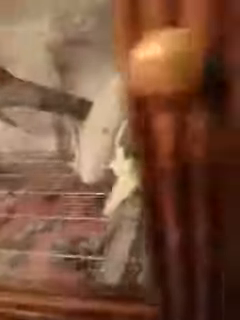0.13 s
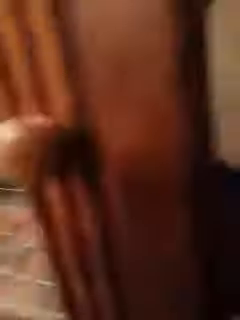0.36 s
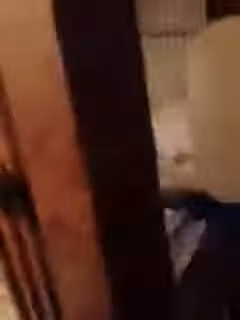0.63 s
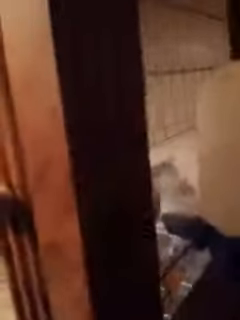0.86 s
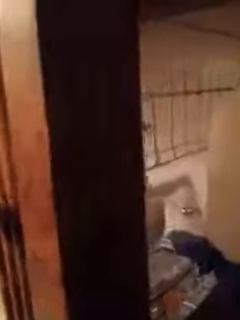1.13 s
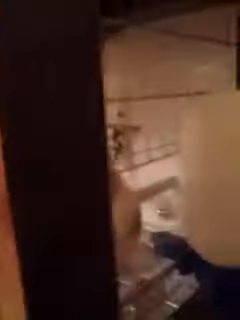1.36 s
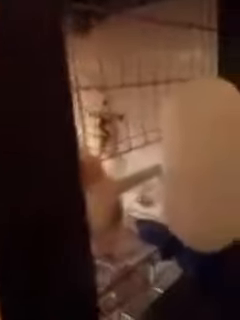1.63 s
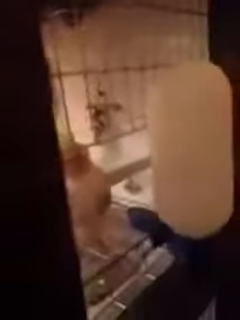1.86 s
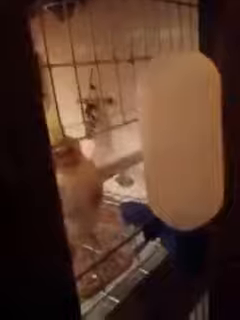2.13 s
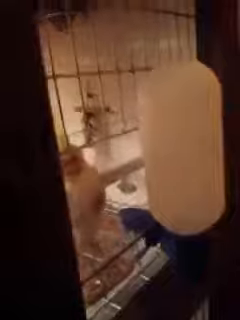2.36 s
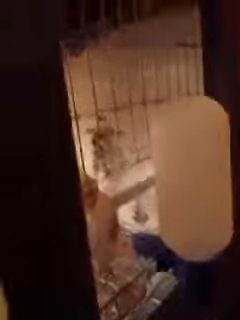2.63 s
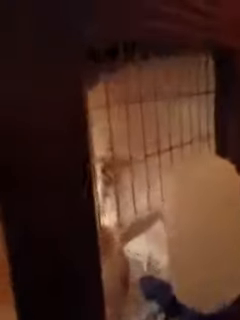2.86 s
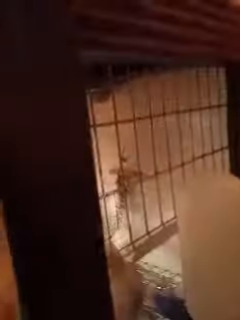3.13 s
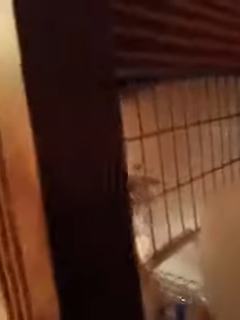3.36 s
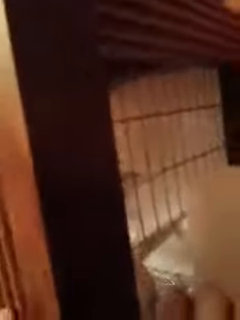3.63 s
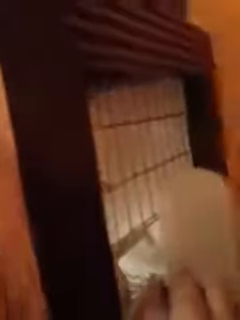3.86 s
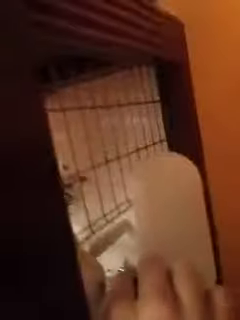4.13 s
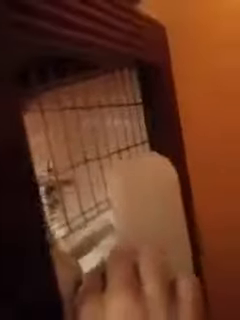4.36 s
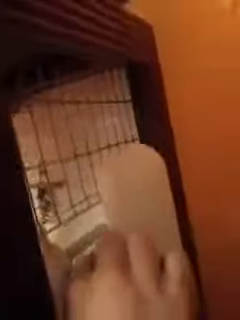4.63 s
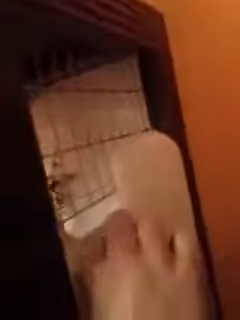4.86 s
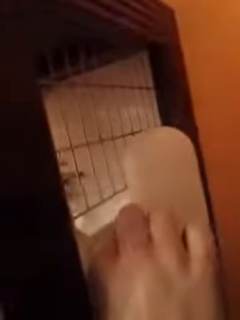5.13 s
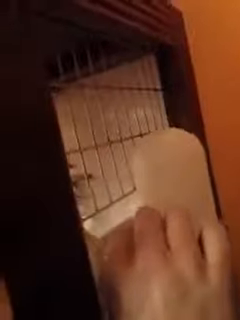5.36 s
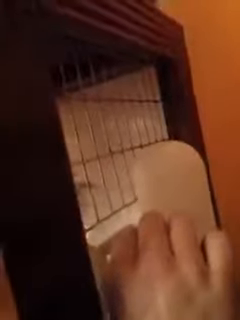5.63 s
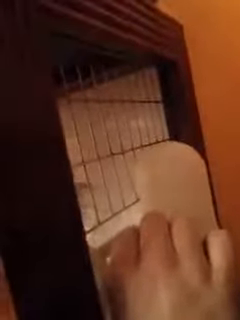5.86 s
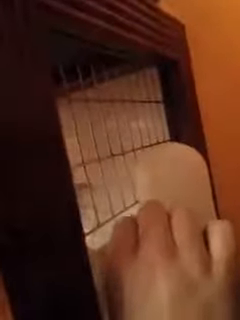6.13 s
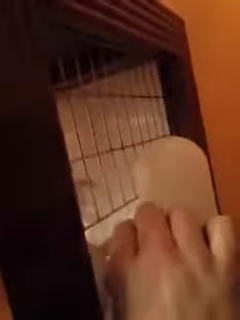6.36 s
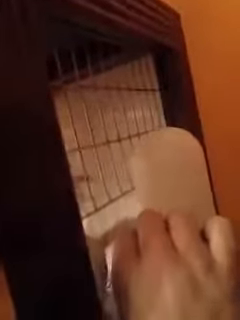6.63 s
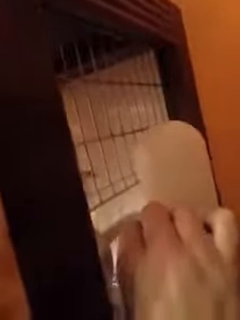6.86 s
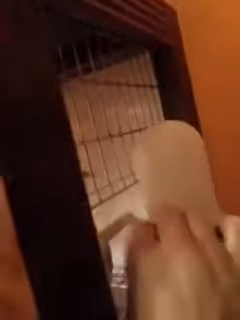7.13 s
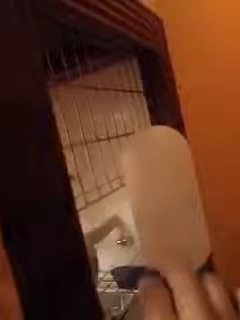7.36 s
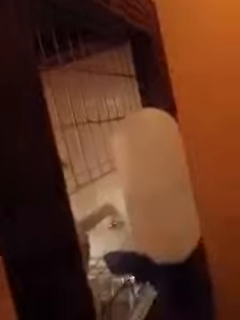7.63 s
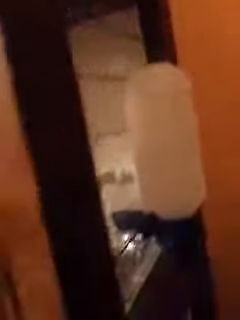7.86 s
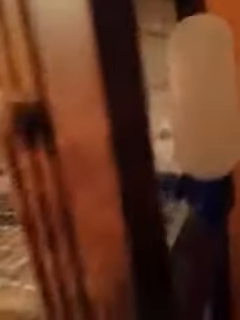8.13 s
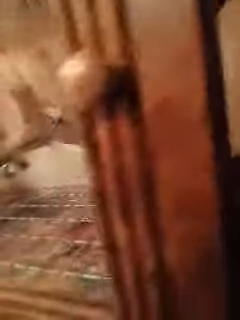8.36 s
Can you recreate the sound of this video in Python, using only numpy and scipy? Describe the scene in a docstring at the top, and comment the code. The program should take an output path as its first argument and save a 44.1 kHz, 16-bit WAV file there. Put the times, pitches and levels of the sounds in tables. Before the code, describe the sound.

A small quiet room, heard close by a phone in stereo, with faint hiss, a weak low hum and a short dull room tail. At 0 s a soft bump and rub are already fading; a light tick follows at 0.5. Gentle scuffs and muffled bumps continue, with a clearer knock at 2.2. From 2.7 to 3.0 a bright rustle of skin on wire swells, with a sharp click at 2.87 and a tiny wire ring at 3.0, then a dull knock at 3.14. Rubbing swells around 3.4 and 3.9, then calms. At 5.14 a hollow wooden thump sounds with a brief panel hum. Soft low bumps come near 5.9, and a dish scrapes finely from 6.0 to 6.6. At 6.66 one hard, bright, woody knock is the loudest event, with a rough short tail. Faint scuffs, ticks and small bumps last until 8.5, over a barely audible distant engine.

```python
"""Hands at a wooden birdcage

Close by in a small quiet room, hands work at a cage and its feeding dish. Tiny random slips, filtered,
make skin rub on wire and wood and the dish slide. Fading sines ring for bumps, one hard knock and a
flicked wire; a wavering sine hums for a shaken thin panel; short noise bursts make ticks and scratches.
A phone hears it all through two ports, with a brief room tail over faint hiss, a low hum and a far engine."""
import sys
import numpy as np
from scipy import signal
from scipy.fft import rfft, irfft
from scipy.io import wavfile
from scipy.ndimage import uniform_filter1d, map_coordinates

SR = 44100
rng = np.random.default_rng(int(sys.argv[2]) if len(sys.argv) > 2 else 0)


def invert_db(x):
    """Field ratio 10**(x/20) for x, a level in decibels (scalar or array-like)."""
    u = np.asarray(x, float) / 20
    return 10 ** u


def generate_wav(signal):
    """Clip the signal to [-1, 1] and save it as 16-bit WAV at the path in sys.argv[1]."""
    frames = np.transpose(np.atleast_2d(signal))
    scaled = np.clip(frames, -1, 1) * 32767
    pcm = np.round(scaled).astype(np.int16)
    wavfile.write(sys.argv[1], SR, pcm)


N = 374850
TIME = np.arange(N) / SR  # s
HZ = np.maximum(np.fft.rfftfreq(N, 1 / SR), 1)
SWELL_DB = 20  # rise and fade times of gestures are times to change by this much


def unit(x):
    """Scale a sound to rms 1."""
    return x / np.sqrt(np.mean(x ** 2))


def curves(table):
    """Join a timed table's points by straight lines: one value per sample for each column after the time."""
    s, *columns = np.transpose(table)
    return [np.interp(TIME, s, column) for column in columns]


def gains(points):
    """Gain at every frequency from (Hz, dB) points."""
    hz, db = np.transpose(points)
    return invert_db(np.interp(np.log(HZ), np.log(hz), db))


def colour(x, gain):
    """Filter by a gain per frequency."""
    return irfft(rfft(x) * gain, N)


def walk(rate):
    """Wander at random: levels held 1 / rate s, smoothed twice, scaled to rms 1."""
    hold = int(SR / rate)
    steps = np.repeat(rng.standard_normal(N // hold + 1), hold)
    smooth = uniform_filter1d(uniform_filter1d(steps, hold), hold)
    return unit(smooth[:N])


def tone(hz):
    """A sine of rms 1 on a moving pitch."""
    return np.sqrt(2) * np.sin(2 * np.pi * np.cumsum(hz) / SR)


def grit(per_s, scatter_db):
    """Tiny slips at random moments, many small and a few large."""
    slips = rng.random(N) < per_s / SR
    return slips * rng.standard_normal(N) * invert_db(scatter_db * rng.exponential(size=N))


def swells(s, db, rise_s, fade_s, held_s=0, share=1, rounded=1):
    """Gain of overlapping gestures: each swells to its peak, is held and fades; powers add."""
    t = TIME[::64, None]  # a coarse clock is enough for slow gains
    before = np.maximum(s - t, 0) / np.maximum(rise_s, .003)
    after = np.maximum(t - s - held_s, 0) / np.maximum(fade_s, .003)
    # rounded: 1 = pointed peak, 2 = bell
    each = invert_db(db - share * SWELL_DB * (before + after) ** rounded)
    return np.interp(TIME, t[:, 0], np.sqrt(np.sum(each ** 2, axis=1)) + 1e-9)


def add(track, s, sound):
    """Mix a sound in at s seconds."""
    i = max(int(s * SR), 0)
    track[i:i + len(sound)] += sound[:N - i]


# tone colour of the room's hiss: f/Hz, level/dB (per Hz)
HISS_COLOUR = [(16, -31), (28, -7.5), (95, -3), (153, -1.5), (211, -9), (421, -9.5), (697, -20),
               (1070, -19.5), (1280, -21), (2560, -26), (5380, -24), (8460, -27.5), (14800, -27),
               (16000, -42.5)]
# overall hiss, before the left/right balance: level/dB
HISS_DB = -67
# a low hum swells and sinks around these levels: t/s, level/dB
HUM = [(0.0, -65), (0.25, -85), (0.77, -79), (1.21, -97), (1.25, -92), (2.88, -65.5), (3.07, -76.5),
       (5.1, -82)]
# a far engine through the walls, its level wandering around these: t/s, f/Hz, level/dB
ENGINE = [(5.15, 38.3, -77), (5.26, 38.2, -62), (5.85, 37, -66), (6.45, 37.2, -66), (6.8, 39, -57.5),
          (7.15, 43.8, -68.5), (7.73, 43.4, -62), (8.07, 39.6, -65), (8.5, 39.4, -61.5)]


def floor():
    """Room tone and microphone hiss, alike left and right only in the bass, a low hum and a far engine."""
    mid, side = rng.standard_normal((2, N))
    apart = np.array([[1], [-1]]) / (1 + (350 / HZ) ** 0.68)
    hiss = unit(colour(mid, gains(HISS_COLOUR)) + colour(side, gains(HISS_COLOUR) * apart))
    engine_hz, engine_db = curves(ENGINE)
    comes_in = np.clip(3 * (TIME - 4.85), 0, 1)
    engine = invert_db(engine_db + 1.5 * walk(9.7)) * tone(engine_hz) * comes_in
    hum_hz = 47.2 * (1 + .03 * walk(5.5))
    hum = invert_db(curves(HUM)[0] + 2.6 * walk(8.)) * tone(hum_hz)
    balance = invert_db(np.array([[-.7], [.7]]))  # dB: left a little softer than right
    return balance * (invert_db(HISS_DB) * hiss + engine + hum)


def patchy(x, low_hz, count, patchy_db):
    """Half-octave bands that flicker apart, as the rubbed spot keeps changing."""
    out = 0
    for hz in low_hz * 2 ** (np.arange(count) / 2):
        band = np.clip(1 - 2 * np.abs(np.log2(HZ / hz)), 0, 1)
        out = out + invert_db(patchy_db * walk(35.)) * colour(x, band)
    return out


# notes of the wires: f/Hz, t60/s (time to fade 60 dB when rubbed; a flick rings 2.1 times as long)
WIRES = [(2330, .03), (3300, .02), (3720, .04), (5450, .04), (6300, .02), (7250, .03)]


def wires(slips):
    """The wires ring under the slips, now one and now another."""
    out = 0
    for hz, t60 in WIRES:
        resonance = 1 / (1 + 1j * (HZ - hz) * .9 * t60)
        out = out + invert_db(4.0 * walk(12.)) * colour(slips, resonance) * np.sqrt(t60)
    return unit(out)


# strokes of the hands, and near 6.72 s the rough tail of the hard knock: t/s of the peak,
# rustle level/dB, drag on the wood level/dB, swell/s and fade/s by SWELL_DB
# (anything under .003, even below zero, counts as .003)
STROKES = [(0.0, -56, -59, .01, 0.09), (0.17, -69.5, -62.5, -0.1, -0.38), (0.29, -75, -67, 1, 0.5),
           (0.41, -69, -67, 0.1, 0.15), (0.56, -71, -67.5, 0, 0.5), (0.63, -72.5, -69.5, 0.3, 0.2),
           (0.77, -80, -70, -0.8, 0.1), (1.015, -77, -64.5, 0.03, 0.03), (1.33, -71.5, -68, -0.06, 0.75),
           (1.4, -79, -69, 0.1, 0.4), (1.569, -67, -61, -0.04, 0.25), (1.67, -64, -60.5, 0.06, 0.06),
           (1.975, -75.5, -71, -0.15, 0.2), (2.19, -65.5, -59.5, 0.05, 0.35), (2.26, -90, -62, -0.55, 0.1),
           (2.389, -65, -59.5, -0.01, 0.07), (2.529, -67, -60.5, -0.4, 1), (2.725, -49.5, -63, 0.06, .15),
           (2.79, -44.5, -62, 0.0921, 0.21), (2.85, -43.5, -58, 0.0925, 0.11),
           (2.904, -42.5, -53.5, 0.0942, 0.0875), (3.0, -55, -62, 0.04, .06),
           (3.06, -88.5, -57.5, 0.17, 0.06), (3.14, -56.5, -52.5, 0.13, 0.1), (3.3, -70, -71.5, 1.2, 0.7),
           (3.39, -54.5, -59.5, 0.12, 0.16), (3.47, -52.5, -60, 0.15, 0.09), (3.56, -63, -56, 0.3, 0.1),
           (3.88, -55.5, -62.5, 0.1, 0.09), (3.944, -47, -60, 0.13, 0.08), (4.11, -66, -62.5, 0.28, 0.26),
           (4.25, -76, -66, 1, .15), (4.412, -67, -61, 0.08, 0.13), (4.908, -66, -61.5, 0.04, 0.2),
           (5.0, -71, -62.5, -0.02, 0.3), (5.118, -59, -54, 0.045, 0.18), (5.242, -69, -55.5, -0.13, 0.23),
           (5.35, -65.5, -61.5, 0.16, 0.17), (5.44, -65.5, -72, 0.24, 0.04), (5.56, -66, -63, 0.1, .2),
           (5.7, -68.5, -64, .15, 0.16), (5.861, -67, -59, -0.5, 0), (5.975, -60, -63, 0.06, 0.21),
           (6.09, -57.5, -53.5, 0.2051, 0.09), (6.33, -68.5, -63.5, 0.3, 0.55),
           (6.5, -54, -57.5, 0.1155, 0.1845), (6.649, -48, -48, 0.2076, -0.0235),
           (6.72, -62, -46, 0.09, 0.17), (6.754, -60.5, -56.5, 0.25, 0.27), (7.0, -65, -57.5, 0.14, 0.21),
           (7.13, -73, -63, -0.9, 0.36), (7.25, -67.5, -62, 0.14, 0.21), (7.792, -70.5, -66, 0.44, 0.36),
           (8.092, -71.5, -63, 0.12, 0.4), (8.26, -68.5, -69.5, 0.14, 2.5), (8.35, -70, -65.5, .08, 3.5),
           (8.46, -70, -59.5, 0.08, -0.1)]
# tone colour of the rustle: f/Hz, level/dB (per Hz)
RUSTLE = [(410, -34), (700, -3.5), (777, -15.5), (958, -6), (1280, -5.5), (1750, -4), (2130, -2.5),
          (2400, -3.5), (2800, -1), (3550, -3.5), (5470, -3), (8100, -14.5), (14600, -22), (16000, -18)]
# added level of the rustle's top treble: t/s, level/dB
BRIGHT = [(0, 3), (4.8, -0.1), (5.1, 3.5), (5.8, 5.5), (6.6, 2), (8.5, 2)]
# wire ringing, as a share of the rustle: level/dB
WIRES_DB = -10.5
# what the cage and dish ring with: f/Hz, level/dB, t60/s (time to fade 60 dB when free;
# each bump takes its own share of it, and the drag rings about half as long)
CAGE = [(92, -0.5, 0.39), (115.7, -3.5, 0.56), (132.6, 3.5, 0.26), (171, 4.5, 0.27), (230.3, 2, .22),
        (278, 2, 0.067), (338.7, -4, 0.31), (369, -4, 0.17), (430, 1.5, 0.12), (484, -0.5, 0.09),
        (521, -6.5, 0.17), (566, -2, 0.076), (655.6, -10, .15), (750, -9.5, 0.064), (862, -7.5, 0.066),
        (929, -8, 0.053), (1014, -1, 0.043), (1240, -8, 0.037), (1430, -2.5, 0.091), (1638, -11, 0.24),
        (1750, -7, 0.27), (1870, -15, 0.13), (1790, 4, 0.054), (1930, 6.5, 0.033), (2170, -9.5, .09),
        (2290, -8, 0.082), (2400, -5, 0.075), (2640, 1, 0.036), (2840, 4.5, 0.071)]


def rubbing():
    """Skin slips over wire (rustle) and drags on wood, coloured by its modes; the hard knock leaves a rough tail."""
    s, rustle_db, drag_db, rise_s, fade_s = np.transpose(STROKES)
    rounded = 1.415
    # firmer rubbing, above -53 dB, is brighter
    treble_db = rustle_db - 6.5 + 0.13 * (rustle_db + 53)
    slips = grit(20000., scatter_db=1.2) * invert_db(.6 * walk(60.))
    slips = patchy(slips, 500., count=11, patchy_db=.7)
    upper = 1 / (1 + (8000 / HZ) ** 6)
    body = unit(colour(slips, gains(RUSTLE) * (1 - upper)))
    treble = unit(colour(slips, gains(RUSTLE) * upper))

    pull_band = 1 / (1 + (HZ / 700) ** 2) / (1 + (190 / HZ) ** 4)
    pull = colour(grit(4000., scatter_db=2.0), pull_band)
    # the grip shifts, so every mode comes and goes on its own
    drag = 0
    for hz, db, t60 in CAGE:
        if 200 < hz < 1700:
            resonance = 1 / (1 + 1j * (HZ - hz) * 0.44 * t60)
            drag = drag + invert_db(db + 3.25 * walk(25.)) * colour(pull, resonance)

    rustle = swells(s, rustle_db, rise_s, fade_s, rounded=rounded) * (body + invert_db(WIRES_DB) * wires(slips))
    top = swells(s, treble_db, rise_s, fade_s, rounded=rounded) * invert_db(curves(BRIGHT)[0]) * treble
    # the drag swells and fades by slightly fewer dB than the rustle
    drag = swells(s, drag_db, rise_s, fade_s, share=0.98, rounded=rounded) * unit(drag)
    return rustle + top + drag


# the panel is shaken: t/s of the peak, level/dB (before a random wander)
SHAKES = [(0.02, -54), (.1, -61.5), (.46, -69), (.63, -66.5), (1.0, -57.5), (1.4, -58.5), (1.58, -54),
          (1.67, -54.5), (2.2, -54.5), (2.27, -54), (2.36, -63), (2.45, -59.5), (2.54, -62), (2.63, -65),
          (2.95, -56.5), (3.16, -52), (3.539, -47.5), (3.6, -57), (3.83, -70), (4.34, -58.5), (4.93, -62),
          (5.171, -42.5), (5.25, -57), (5.39, -47), (5.43, -56.5), (5.63, -63.5), (5.875, -55),
          (5.905, -55), (6.05, -55), (6.11, -50.5), (6.26, -66), (6.49, -53.5), (6.58, -55), (7.04, -59),
          (7.34, -64.5), (7.57, -56.5), (7.79, -67.5), (7.94, -62), (8.36, -51.5), (8.45, -65.5)]


def panel():
    """One thin panel hums at its own pitch, wavering a little as the grip changes."""
    s, db = np.transpose(SHAKES)
    shaken = swells(s, db, rise_s=0.058, fade_s=0.072, rounded=1.3)
    hum_hz = 160.7 * (1 + .015 * walk(14.))
    return shaken * invert_db(2.9 * walk(30.)) * tone(hum_hz)


# bumps on the cage: t/s, peak level/dB, f/Hz that the struck spot favours, spread/octaves,
# share of the free ring time
BUMPS = [(0.001, -38, 264, 1.03, .65), (0.138, -58, 1290, 1.16, 0.43), (0.522, -50.5, 129, 0.61, 0.22),
         (1.313, -54, 479, 0.78, 0.83), (1.508, -54, 350, 0.9, .3), (1.686, -52.5, 111, 0.24, 0.25),
         (1.977, -52.5, 690, 0.48, 0.12), (2.162, -36, 1310, 1.6, 0.58), (2.274, -50, 98, 0.29, 1.1),
         (2.53, -41.5, 650, 0.8, 0.45), (2.598, -50.5, 118, 0.38, 0.79), (3.139, -33.5, 810, 0.7, 0.17),
         (4.076, -49, 400, .7, .15), (4.413, -51.5, 420, 0.38, .4), (4.994, -51, 704, 0.58, 0.32),
         (5.094, -51, 1010, 1.4, 0.61), (5.137, -23, 317, 0.64, 0.74), (5.138, -32.5, 542, 0.22, 0.71),
         (5.164, -34.5, 188, 0.52, 2), (5.856, -42.5, 164, 0.26, 0.59), (5.965, -41.5, 165, 0.97, 3),
         (6.66, -12, 2050, 0.32, 0.2), (6.662, -17.5, 862, 0.56, 0.43), (6.663, -24.5, 1740, 0.12, 1.4),
         (6.742, -41, 1650, .3, .8), (6.665, -21, 1757, .3, .4), (6.676, -21, 535, 0.37, .8),
         (6.664, -30, 249, 0.33, 0.38), (6.682, -27, 151, 0.49, 1.05), (7.556, -50, 105, 0.13, 1.43),
         (7.748, -52, 205.6, 0.57, 0.89), (7.79, -49, 296, 0.43, 0.58), (8.072, -47, 174, 0.73, .74),
         (8.094, -51, 103.7, 0.31, 1.3)]


def bumps():
    """Each bump rings the modes near the pitch its spot favours; soft contact swells slowly, a firm grip damps."""
    out, t = np.zeros(N), TIME[:SR // 2]
    hz, db, t60 = np.transpose(CAGE)[:, :, None]
    sign = (-1) ** np.arange(len(CAGE))[:, None]
    swings = invert_db(db) * np.sin(2 * np.pi * hz * t) * sign
    for s, peak_db, spot_hz, octaves, free in BUMPS:
        # contact lasts about half a swing, longer where a low spot gives way
        rise_ms = 1000 * 0.53 / spot_hz * (1 + (118 / spot_hz) ** 4)
        share = np.exp(-.5 * (np.log2(hz / spot_hz) / max(octaves, .1)) ** 2)
        fade = invert_db(-60 * t / (t60 * max(free, .05)))
        ring = np.sum(share * swings * fade, axis=0)
        ring *= 1 - np.exp(-1000 * t / max(rise_ms, .05))
        add(out, s, invert_db(peak_db) * ring / np.abs(ring).max())
    return out


# small ticks and scratches: t/s, peak level/dB, f/Hz, width/octaves, t60/s (time to fade 60 dB)
TICKS = [(.338, -58, 1600, .5, .05), (0.524, -35.5, 5600, 1.23, 0.046), (.534, -38, 7000, 3.7, 0.048),
         (.544, -46.5, 7000, 2.5, 0.14), (1.5125, -51, 6200, 0.63, 0.023), (1.5564, -50, 6240, .99, .045),
         (2.163, -38.5, 2560, 2.2, 0.06), (2.5258, -48, 3580, 2.4, 0.014), (2.6, -46.5, 4690, 1.2, 0.035),
         (2.868, -21.5, 3200, 1.8, 0.01), (2.878, -30, 2780, 0.66, 0.041), (4.319, -47, 2830, 2.5, 0.053),
         (4.4123, -46.5, 2090, 1.8, .041), (5.113, -50.5, 2160, .25, 0.08), (5.1344, -45, 4500, 1.3, .03),
         (5.2315, -43.5, 3260, 1.14, 0.022), (5.276, -45, 4570, 1, 0.026), (6.1769, -52, 5570, 1.1, 0.03),
         (6.312, -46, 5500, 1.6, 0.027), (6.4185, -42.5, 2270, .6, 0.032), (6.66, -16, 3380, 1.12, 0.024),
         (6.661, -31.5, 7000, 2.7, 0.053), (7.5475, -54, 4510, 1.7, 0.055), (7.7947, -53, 3970, 0.94, .047),
         (8.251, -51.5, 5440, 0.81, 0.04), (8.334, -53, 5330, 1, .051)]


def ticks():
    """A burst of slips that dies at once, in a band around its pitch."""
    out, t = np.zeros(N), TIME[:SR // 4]
    for s, peak_db, hz, octaves, t60 in TICKS:
        noise = rng.standard_normal(len(t))
        reach = 2 ** (max(octaves, .2) / 2)
        edges = [hz / reach, min(hz * reach, .45 * SR)]
        band = signal.butter(2, edges, "band", fs=SR, output="sos")
        shape = (1 - np.exp(-t / 0.0027)) * invert_db(-60 * t / max(t60, .005))
        tick = signal.sosfilt(band, noise) * shape
        add(out, s, invert_db(peak_db) * tick / np.abs(tick).max())
    return out


# a wire is flicked: t/s, peak level/dB
PLUCKS = [(2.988, -42)]


def plucks():
    """A flick rings all the wires at once, each a fading sine."""
    out, t = np.zeros(N), TIME[:SR // 4]
    ring = sum(np.sin(2 * np.pi * hz * t) * invert_db(-60 * t / (2.1 * t60)) for hz, t60 in WIRES)
    ring = ring * (1 - np.exp(-t / .002))
    for s, peak_db in PLUCKS:
        add(out, s, invert_db(peak_db) * ring / np.abs(ring).max())
    return out


# resonances of the dish: f/Hz (each slide shifts it by its pitch share), width/Hz, level/dB
DISH = [(947, 90, 4), (2172, 280, 7), (3100, 1200, -5), (4560, 400, 4), (5750, 830, -8)]
# the dish slides in its holder: t/s of the peak, level/dB, swell/s and fade/s by SWELL_DB
# (anything under .003 counts as .003), held/s, pitch as a share of the DISH frequencies
SLIDES = [(5.54, -71, 0.3, 0.1, 0.18, .97), (5.965, -59, .02, 0.08, 0.13, .96),
          (6.41, -59, -0.02, 0.32, .08, 1), (6.5, -54.5, .03, 0.03, 0.07, 1.03),
          (6.585, -52, 0.01, 0.01, 0.07, .95), (6.84, -64.5, 0.16, .1, 0.025, .92),
          (7.0, -74, -0.3, 0.3, .01, 1.03), (7.26, -71.5, 0, .03, .01, 1.02)]


def dish():
    """Fine slips ring the resonances of the sliding dish, whose pitch depends on how it sits."""
    out, slips = 0, grit(8000., scatter_db=1.0)
    for *gesture, pitch in SLIDES:
        hollow = sum(invert_db(db) / (1 + (2 * (HZ - pitch * hz) / width) ** 2) for hz, width, db in DISH)
        out = out + swells(*np.transpose([gesture])) * unit(colour(slips, hollow))
    return out


def lagged(x, late_ms):
    """Read the sound a moving fraction of a millisecond late (early if negative)."""
    return map_coordinates(x, [np.arange(N) - late_ms * SR / 1000], order=3)


# where the hands are: t/s, lateness/ms at the left port (negative = early)
LATE = [(0, 0.071), (1.9, 0.13), (2.1, -.33), (3.3, -0.34), (3.9, -.42), (4.4, -0.29), (4.7, 0.072),
        (8.5, 0.13)]
# the phone's body shades the left port: f/Hz, left minus right level/dB
SHADE = [(60, -2), (700, -1), (1300, -3), (2400, 3), (4400, -6), (8100, -10.5), (15000, -9)]


def ports(rubbed, rung):
    """Left hears the cage shaded and a little early or late; the room adds a short, duller tail."""
    x, late_ms = rubbed + rung, curves(LATE)[0]
    # a rubbed contact hops about, so its lag wobbles
    shifted = lagged(rung, late_ms) + lagged(rubbed, late_ms + 0.05 * walk(140.))
    t = TIME[:SR // 2]
    # treble reaches the shaded port only by scattering off hand and wires
    scatter = rfft(rng.standard_normal(len(t)) * invert_db(-60 * t / 0.066), N)
    scatter = scatter / np.sqrt(uniform_filter1d(np.abs(scatter) ** 2, size=8000))
    high = 1 / (1 + (4500 / HZ) ** 4)
    left = colour(shifted, gains(SHADE) * (1 - high + high * scatter))
    # share the shading between both ports
    direct = colour(np.array([left, x]), 2 / (1 + gains(SHADE)))

    room_t60_s, room_db = 0.24, -8.5
    mid, side = rng.standard_normal((2, len(t))) * invert_db(-60 * t / room_t60_s) * (t > .004)
    # the tail is weak in the bass, and what bass remains is opposite at the two ports
    apart = np.array([[1], [-1]]) / (1 + (280 / HZ) ** 1.1)
    tail = rfft(mid, N) / (1 + (300 / HZ) ** 4) + apart * rfft(side, N)
    duller = 1 / np.sqrt(1 + (HZ / 2600) ** 2)
    tail = tail * duller / np.sqrt(np.sum(mid ** 2))
    return direct + invert_db(room_db) * colour(x, tail)


def scene():
    """Everything at the cage reaches the two ports over the floor."""
    rung = panel() + bumps() + ticks() + plucks() + dish()
    return ports(rubbing(), rung) + floor()


def roll_off(x):
    """The treble ends steeply here."""
    return signal.sosfilt(signal.butter(12, 16650, fs=SR, output="sos"), x)


def record(dry):
    """The phone cuts the top above 15570 Hz with a steep filter and sits slightly off zero."""
    low_pass = signal.ellip(10, .2, 60, 15570, fs=SR, output="sos")
    cut = signal.sosfilt(low_pass, dry)
    return roll_off(cut - .0002)


dry = scene()
out = record(dry)
generate_wav(out)
```